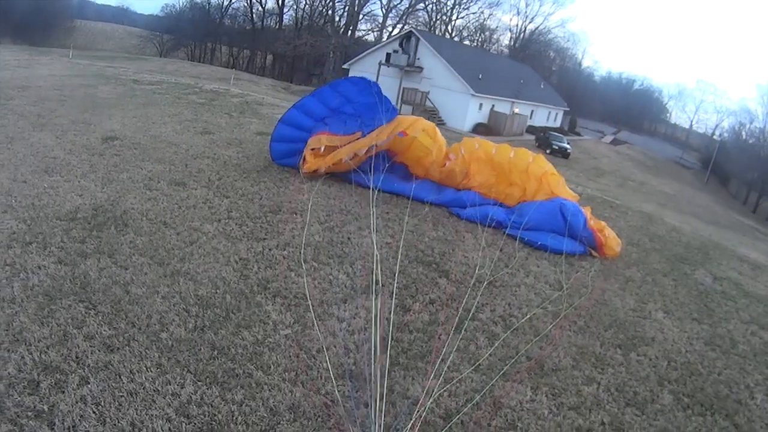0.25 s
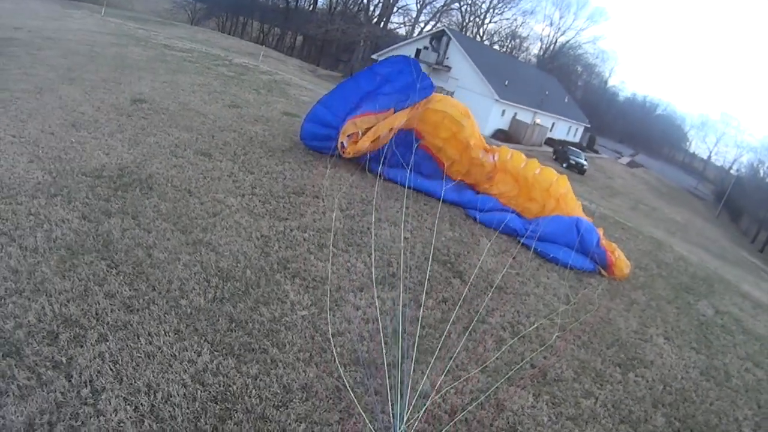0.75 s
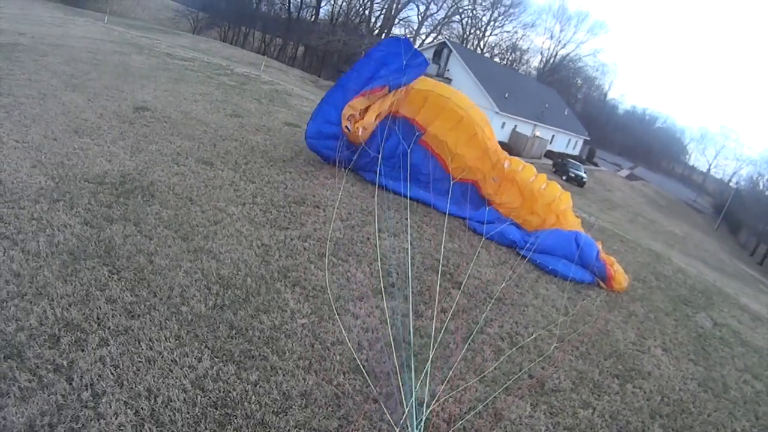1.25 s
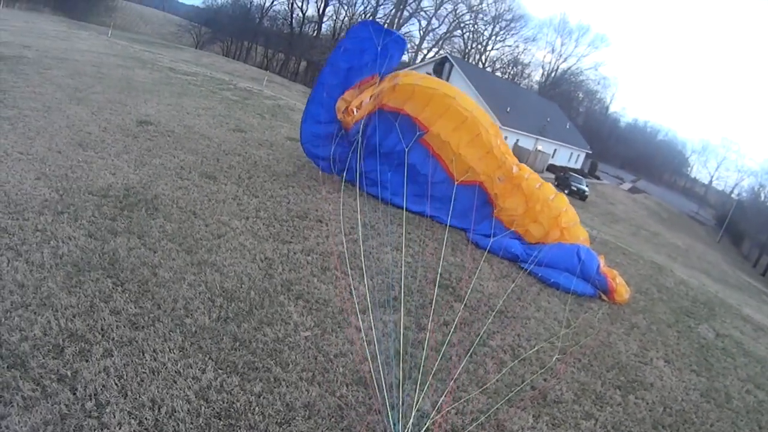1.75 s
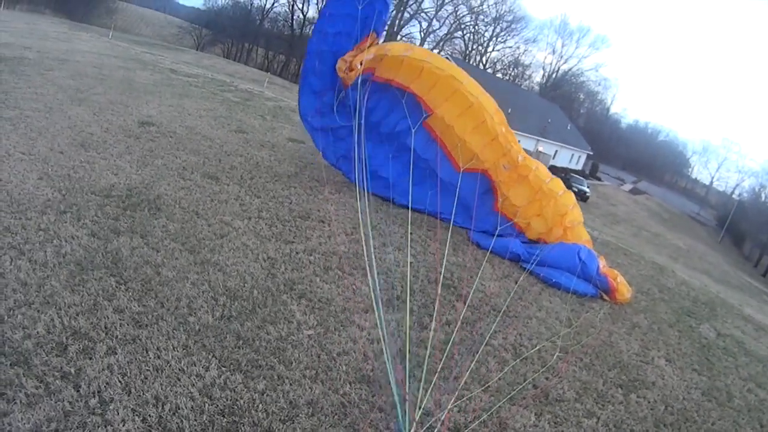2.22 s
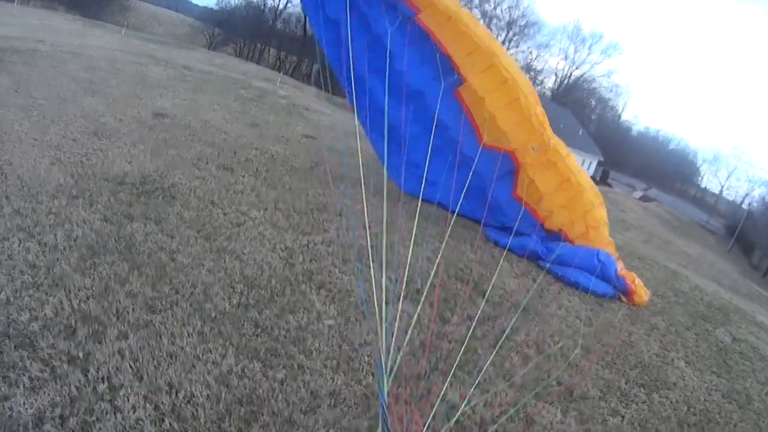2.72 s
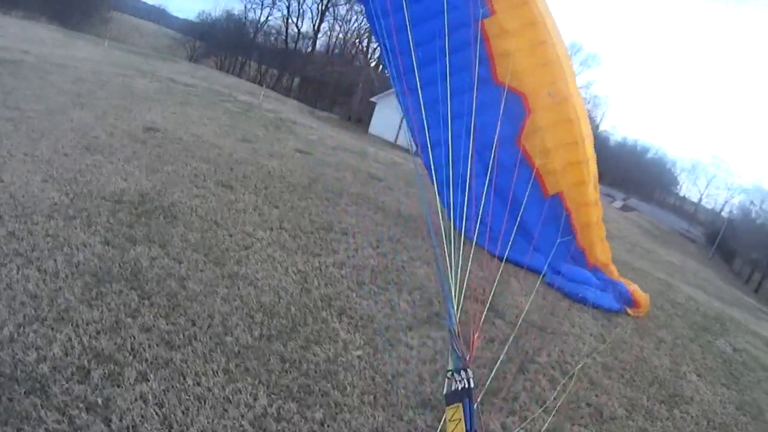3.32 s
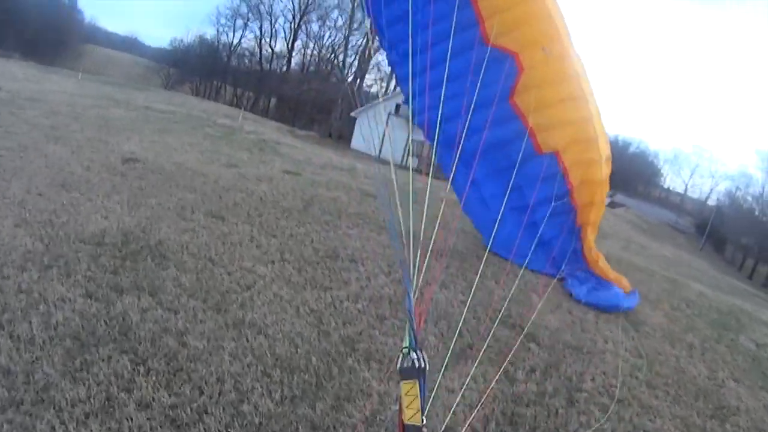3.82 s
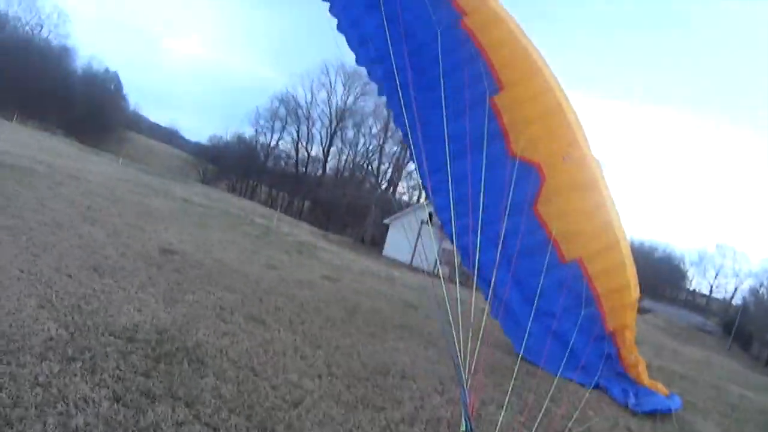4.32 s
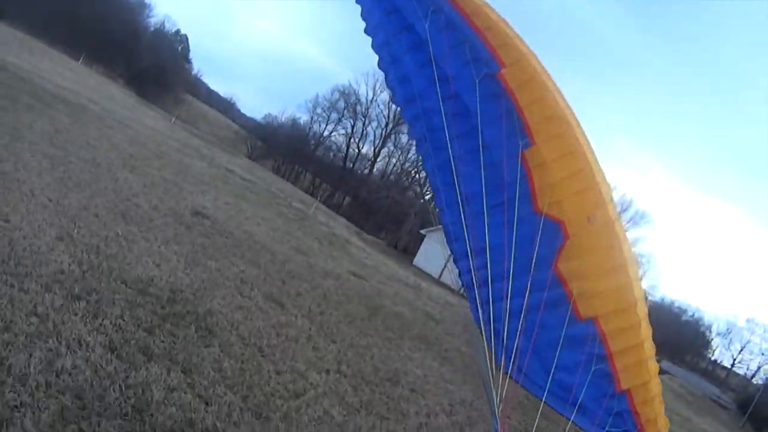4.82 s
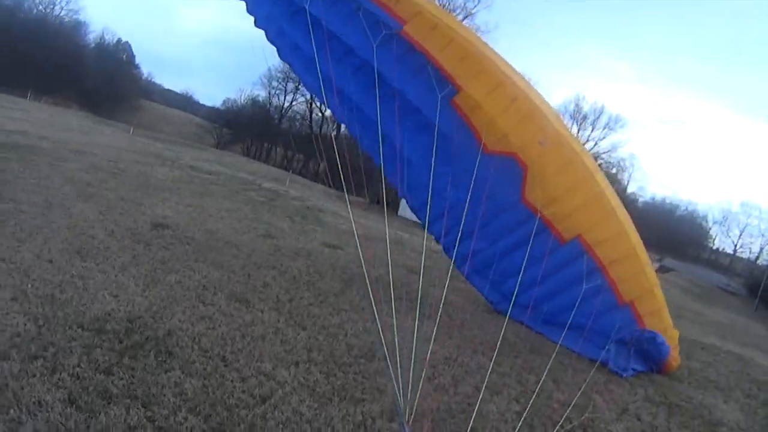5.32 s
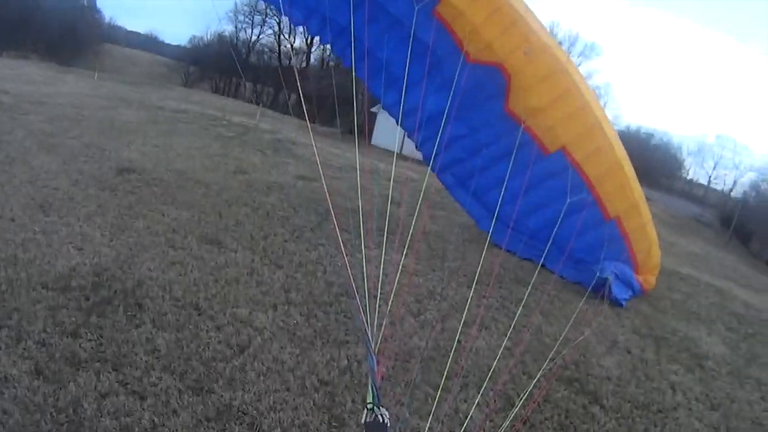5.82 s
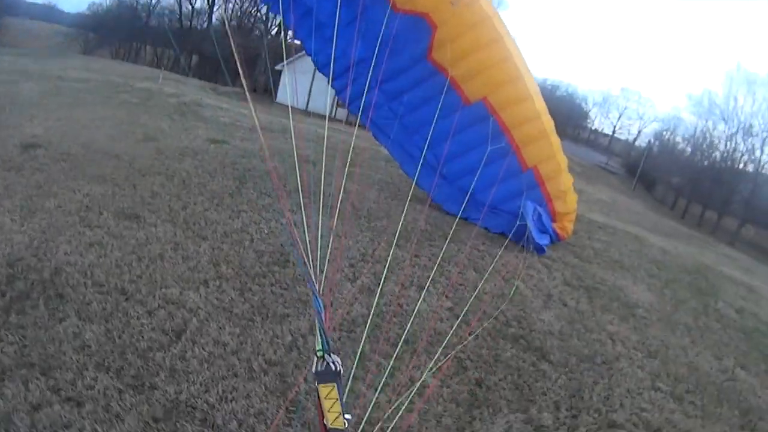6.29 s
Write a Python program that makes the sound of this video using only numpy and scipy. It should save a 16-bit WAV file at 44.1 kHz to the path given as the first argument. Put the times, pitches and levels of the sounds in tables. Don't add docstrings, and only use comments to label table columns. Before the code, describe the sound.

Quiet at first: faint rumbling wind and thin fabric rustling. As the wing fills, the rustle swells, followed by crowded plastic clacks, strap rubs, dull jolts and deep gust thuds, very close and in stereo. A short lull precedes the biggest thump and groaning creak, after which it calms to nylon hiss, a few fine clicks and a last brief squeak. Open field, no echo.

```python
import sys
import numpy as np
from scipy import signal
from scipy.fft import rfft, irfft, next_fast_len
from scipy.io import wavfile
from scipy.ndimage import uniform_filter1d, minimum_filter1d, map_coordinates

SR = 44100
rng = np.random.default_rng(int(sys.argv[2]) if len(sys.argv) > 2 else 0)


def makeup_ratio(level_db):
    decades = np.asarray(level_db, float) / 20
    return 10 ** decades


def log_audio(samples):
    frames = np.atleast_2d(samples).T
    limited = np.clip(frames, -1, 1)
    pcm = np.round(limited * 32767).astype(np.int16)
    wavfile.write(sys.argv[1], SR, pcm)


N = 288855


def unit(x):
    return x / np.sqrt(np.mean(x ** 2) + 1e-20)


def along(points, hz):
    f, v = np.transpose(points)
    return np.interp(np.log(hz + 1), np.log(f + 1), v)


def curves(rows):
    s, *cols = np.transpose(rows)
    return [np.interp(np.arange(N) / SR, s, c) for c in cols]


def wobble(rate):
    knots = rng.standard_normal(int(N * rate / SR) + 4)
    return map_coordinates(knots, [np.arange(N) * rate / SR])


def filtered(x, response):
    m = next_fast_len(N + SR // 8)
    return irfft(rfft(x, m) * response(np.fft.rfftfreq(m, 1 / SR)), m)[..., :N]


def add(track, s, burst):
    start = round(s * SR)
    part = track[..., start:start + burst.shape[-1]]
    part += burst[..., :part.shape[-1]]


# frequency in Hz, likeness (1 is the same).
PORT_LIKENESS = [(40, 0.99), (90, 0.89), (170, 0.83), (300, 0.86), (550, 0.25), (1100, 0.66), (1650, 0.81),
                 (2050, 1), (2800, 0.86), (5000, 0.98), (6700, 0.92), (10000, 0.94)]


def rush(spectrum, patchy_db, grainy_db, common=1):
    z = signal.stft(rng.standard_normal((2, N)), nperseg=512)[2]
    field = uniform_filter1d(rng.standard_normal(z.shape[1:]), 6, 0)
    field = unit(uniform_filter1d(field, 10, 1))
    pair = signal.istft(z * makeup_ratio(patchy_db * field), nperseg=512)[1][:, :N]
    pair = pair * makeup_ratio(grainy_db * wobble(300))

    def mid_side(hz):
        turn = np.arccos(np.clip(common * along(PORT_LIKENESS, hz), -1, 1)) / 2
        return makeup_ratio(along(spectrum, hz)) * [np.cos(turn), np.sin(turn)]

    mid, side = filtered(pair, mid_side)
    return unit(np.array([mid + side, mid - side]))


# time in seconds, strength at the ports in dB.
WIND_STRENGTH = [(0, -42), (.38, -39), (.64, -47), (.91, -43.5), (1.2, -45.5), (1.65, -44.5), (1.76, -48.5),
                 (1.9, -44), (2.5, -42), (2.64, -35.5), (2.92, -34.5), (3.1, -43.5), (3.6, -29.5),
                 (4.2, -36), (5.4, -34.5), (5.6, -47), (5.85, -39.5), (6.55, -32)]
# time in seconds, peak in dB, half length in seconds.
PUFFS = [(0.373, -46, 0.21), (1.368, -49, .1), (1.636, -41.5, 0.096), (2.2, -38, 0.053), (2.642, -37, 0.18),
         (2.89, -30.5, 0.23), (3.24, -33.5, 0.13), (3.452, -24, 0.064), (3.667, -28.5, 0.14),
         (3.904, -25.5, 0.041), (4.1, -25.5, 0.14), (4.325, -21, 0.061), (4.456, -30, 0.048),
         (4.654, -27.5, .11), (5.196, -56, 0.47), (5.539, -10.5, 0.037), (5.629, -14.5, 0.052),
         (5.75, -22.5, 0.032), (5.994, -32, .07), (6.341, -31, 0.084), (6.514, -51, .1)]


def wind_levels():
    buffet_over_wind_db, puff_fall_db = -7, 15
    puff_share = 0.26
    wind_db, = curves(WIND_STRENGTH)
    t = np.arange(N) / SR
    power = makeup_ratio(2 * (wind_db + buffet_over_wind_db))
    for s, db, half_s in PUFFS:
        power = power + makeup_ratio(2 * (db - puff_fall_db * np.abs(t - s) / half_s))
    buffet_db = 10 * np.log10(power)
    return buffet_db, wind_db + puff_share * (buffet_db - wind_db - buffet_over_wind_db - 8)


# frequency in Hz, level in dB per Hz.
BUFFET_COLOR = [(15, -3.5), (30, -1.5), (60, -10.5), (120, -12), (250, -14.5), (600, -74)]
# frequency in Hz, level in dB per Hz.
BODY_COLOR = [(90, -20), (150, -8), (240, -9), (290, 1), (350, -9), (470, -10), (550, -15), (650, -12),
              (1000, -15), (1500, -30)]


def wind():
    buffet_db, body_db = wind_levels()
    apart = np.clip((buffet_db + 48) / 320, 0, 1)
    shared = rush(BUFFET_COLOR, patchy_db=0.2, grainy_db=1.5)
    separate = rush(BUFFET_COLOR, patchy_db=-6.5, grainy_db=-1.5, common=0)
    lumps = np.sqrt(1 - apart) * shared + np.sqrt(apart) * separate
    buffet = makeup_ratio(buffet_db + 2.2 * wobble(25)) * lumps
    body = makeup_ratio(body_db - 2 + 1.6 * wobble(30)) * rush(BODY_COLOR, patchy_db=1.2, grainy_db=1.5)
    return buffet + body


# time in seconds, level in dB.
FLAPPING = [(0, -35.5), (.62, -39.5), (.87, -39), (1.05, -35), (1.25, -39.5), (2.12, -39), (2.55, -34),
            (2.85, -27.5), (3.16, -32), (3.47, -31), (3.64, -29), (3.77, -35), (3.9, -32.5), (4.03, -39.5),
            (4.32, -36.5), (4.58, -39), (6.25, -39.5), (6.55, -41)]
# time in seconds, share of cloth sound that differs between the ports.
WING_SPREAD = [(0, 0.009), (2.4, 0.021), (2.9, 0.075), (4, 0.19), (6.55, 0.21)]
# frequency in Hz, level in dB per Hz.
RUSTLE_COLOR = [(900, -26.5), (1300, -8.5), (1700, -4), (2050, 0.5), (2400, -5), (2800, -9.5), (3600, -16),
                (5000, -39.5)]
# frequency in Hz, level in dB per Hz.
HISS_COLOR = [(2000, -41), (3000, -14), (3900, -10), (5050, -4.5), (5900, -10), (6500, -13.5), (7200, -10),
              (8900, -18), (9700, -13), (11000, -23)]


def cloth():
    hiss_db, = curves(FLAPPING)
    wide = np.clip(curves(WING_SPREAD)[0], 0, 1)
    rustle_db = hiss_db - 0.46 + 4.5 * wide
    rustle_wide = np.clip(0.5 * wide, 0, 1)
    flap = wobble(21.7)
    out = 0
    for hiss_share, rustle_share, common in ((1 - wide, 1 - rustle_wide, 1), (wide, rustle_wide, 0)):
        rustle = rush(RUSTLE_COLOR, patchy_db=0.8, grainy_db=1.0, common=common)
        rustle = makeup_ratio(rustle_db) * makeup_ratio(0.6 * flap) * rustle
        hiss = rush(HISS_COLOR, patchy_db=1.03, grainy_db=0.97, common=common)
        hiss = makeup_ratio(hiss_db + 0.51 * flap) * hiss
        out = out + np.sqrt(rustle_share) * rustle + np.sqrt(hiss_share) * hiss
    return out


# time in seconds, peak in dB, pitch in Hz.
LINE_TICKS = [(3.2573, -11, 9480), (3.2575, -14, 7120), (3.2577, -6, 4800), (3.3245, -18, 9000),
              (3.353, -16, 7000), (3.8013, -21, 4706), (5.02, -18, 4840), (6.148, -22, 7670),
              (6.1923, -23, 6670), (6.227, -20, 7700), (6.2052, -24, 8950), (6.232, -20, 10600),
              (6.2364, -27, 10300), (6.2506, -21, 9900), (6.2614, -20, 8000), (6.331, -22, 8700)]


def ticks():
    out, t = np.zeros(N), np.arange(SR // 100) / SR
    for s, db, hz in LINE_TICKS:
        click = np.sin(2 * np.pi * hz * t) + 0.45 * rng.standard_normal(len(t))
        add(out, s, makeup_ratio(db - 60 * t / 0.005) * click)
    return filtered(out, lambda hz: hz ** 2 / (hz ** 2 + 3500 ** 2))


# time in seconds, peak in dB, length in seconds.
JOLTS = [(2.789, -25.5, 0.03), (2.884, -42, 0.0061), (3.136, -27.5, 0.038), (3.388, -22, 0.014),
         (3.418, -42, 0.013), (3.59, -37, 0.0079), (3.674, -16, 0.014), (3.827, -24.5, 0.016),
         (3.901, -29, 0.013), (4.082, -21, 0.061), (4.321, -24, 0.05), (4.39, -26.5, 0.014),
         (4.452, -32, 0.012), (4.481, -26.5, 0.027), (4.593, -29, 0.035), (4.636, -40, 0.022),
         (4.678, -30, 0.018), (4.875, -22.5, 0.043), (5.099, -25.5, 0.022), (5.198, -31, 0.016),
         (5.433, -33, 0.026), (5.529, -17.5, 0.026), (5.57, -26, 0.099), (5.671, -30.5, 0.071),
         (5.746, -20, 0.013), (6.357, -20.5, 0.018)]
# frequency in Hz, level in dB per Hz.
JOLT_COLOR = [(20, 8), (100, -18), (200, -3.5), (300, 5.5), (400, -7.5), (700, -7), (1500, -7), (3000, -52)]


def bumps():
    force = np.zeros(N)
    for s, db, length in JOLTS:
        t = np.arange(round(4 * length * SR)) / (length * SR)
        add(force, s - 0.11 * length, makeup_ratio(db + 3.5) * np.minimum(1, 4 * t) * np.exp(-1.2 * t ** 2))
    return force * rush(JOLT_COLOR, patchy_db=-1.5, grainy_db=-4.0, common=0.55)


STRAP_PUSH_PULL = [
    [1.7],
    [-2.4],
]
# time in seconds, level in dB, pitch in Hz, length in seconds,
# facing (positive: ports move together, negative: against each other).
STRAP_RUBS = [(2.648, -19, 2040, 0.014, -0.91), (2.672, -27, 1780, 0.03, -1),
              (2.816, -18, 1900, 0.028, -0.88), (3.83, -20, 1290, 0.015, 1),
              (3.94, -19.5, 656, 0.031, 0.91), (4.077, -30, 1300, .02, 1), (4.75, -22, 1660, .024, -1),
              (4.759, -27, 2050, 0.028, -1), (4.766, -8, 2450, .019, -0.79), (5.447, -23, 980, .026, 1),
              (5.446, -14.5, 2000, .02, 1), (5.499, -22, 1200, 0.04, 1), (5.526, -16.5, 560, 0.032, 1),
              (5.61, -23, 500, 0.031, 1), (5.666, -32, 1400, .02, 1), (6.368, -25.5, 1390, 0.025, 1),
              (6.483, -34.5, 1110, .026, 1)]


def rubs():
    out = np.zeros((2, N))
    for s, db, hz, length, facing in STRAP_RUBS:
        t = np.arange(round(2 * length * SR)) / (length * SR)
        grit = rng.standard_normal(len(t)) ** 3 + 0.35 * rng.standard_normal((2, len(t))) ** 3
        mode = signal.iirpeak(hz, 2.5, SR)
        band = signal.lfilter(*mode, signal.lfilter(*mode, grit))
        sides = np.where(facing < 0, STRAP_PUSH_PULL, 1)
        add(out, s, sides * makeup_ratio(db - 3.0) * unit(band) * np.minimum(1, 3 * t) * np.exp(-t ** 4))
    return out


def driven(rows, rough, fade, lift_db, overtone_db):
    sag = 0.07
    out = np.zeros((2, N))
    for s, db, hz, length in rows:
        t = np.arange(round((length + 6 * fade) * SR)) / SR
        waver = np.interp(t * hz / 2, np.arange(200), rng.standard_normal(200))
        pitch = hz * (1 + rough * waver + sag * (0.5 - np.minimum(t / length, 1)))
        turns = np.cumsum(pitch) / SR + rng.random() + rng.normal(0, 0.02, (2, 1))
        swell = 1 - np.exp(-t / (0.12 * length))
        shape = swell * np.exp(-np.clip(t - length, 0, None) / fade)
        partials = np.cos(4 * np.pi * turns) + 0.5 * np.sin(6 * np.pi * turns)
        tone = np.sin(2 * np.pi * turns) + makeup_ratio(overtone_db) * shape * partials
        add(out, s - 0.2 * length, makeup_ratio(db + lift_db + 43 * rough * waver[::-1]) * shape * tone)
    return out


# time in seconds, level in dB, pitch in Hz, length in seconds.
HOUSING_SQUEAKS = [
    (6.536, -19, 2110, 0.018),
]
# time in seconds, level in dB, pitch in Hz, length in seconds.
STRAP_SQUEAKS = [
    (1.644, -16.5, 2090, 0.0035),
    (1.644, -20, 1350, 0.0028),
]


def squeaks():
    housing, strap = (driven(rows, rough=0.025, fade=0.002, lift_db=-2.5, overtone_db=-40)
                      for rows in (HOUSING_SQUEAKS, STRAP_SQUEAKS))
    return housing + STRAP_PUSH_PULL * strap


# time in seconds, peak in dB, pitch in Hz, length in seconds.
MOUNT_GROANS = [(2.745, -30, 198, 0.024), (2.886, -26.5, 184, 0.016), (2.913, -42, 207, 0.0071),
                (2.947, -27, 190, 0.017), (2.976, -38, 247, 0.023), (3.285, -30, 184, 0.011),
                (3.475, -24.5, 197, 0.023), (3.613, -18, 193, 0.021), (3.701, -17, 178.5, 0.018),
                (4.016, -25.5, 172, 0.031), (4.124, -15, 186, 0.01), (4.284, -16, 230, 0.0084),
                (4.904, -33, 206, 0.013), (5.352, -33.5, 206, 0.023), (5.521, -15.5, 93, .02),
                (5.536, -13.5, 234, .02), (5.625, -6.5, 242, 0.0187), (6.301, -29.5, 209, 0.014),
                (2.745, -24, 195, 0.024),
    (3.875, -25, 189, 0.019),
    (5.022, -30, 183, 0.025),
]


def groans():
    return driven(MOUNT_GROANS, rough=0.04, fade=0.005, lift_db=1.5, overtone_db=-14)


# time in seconds, peak in dB, ring in Hz, brightness of the edge in dB.
HARD_SLIPS = [(2.6045, -19.5, 890, -6), (2.8606, -12.5, 1420, 2), (2.8931, -17.5, 1210, 2),
              (3.3875, -11, 1200, -17), (3.4537, -11.5, 1220, -14), (3.477, -15.5, 1270, 1.5),
              (3.544, -17, 880, -7), (3.5838, -9, 1410, -31), (3.6747, -9, 1430, -23),
              (3.7341, -11.5, 1270, -27), (3.833, -13.5, 1330, -9), (3.8693, -17, 1220, 3),
              (4.0137, -9.5, 1320, -13), (4.124, -16, 560, -24), (4.1415, -11.5, 1200, -34),
              (4.2769, -13.5, 1190, 1.5), (4.332, -8, 1260, -12), (4.3757, -12, 1700, -10),
              (4.3968, -12.5, 1300, -19), (4.6866, -11, 1190, -23), (4.8834, -5.5, 1930, -27),
              (5.1019, -14, 1330, -4), (5.207, -12, 1390, -2), (5.5752, -10.5, 1140, -12),
              (5.6906, -17.5, 1290, -1), (5.748, -13, 1200, -16), (6.148, -15, 1360, 0.5),
              (6.3043, -15.5, 1070, -16), (6.3594, -15.5, 1380, -7.5)]
# time in seconds, peak in dB, ring in
# Hz.
FAINT_SLIPS = [(2.711, -22.5, 2000), (2.878, -32, 1970), (2.9554, -18.5, 1890), (2.987, -20, 2100),
               (3.6414, -26, 1080), (4.1843, -18, 1760), (4.268, -24, 1240), (4.393, -17, 750),
               (4.459, -24.5, 1500), (4.8755, -19.5, 1080), (5.093, -18.5, 1330), (5.259, -25.5, 1970),
               (5.4796, -23, 1960), (5.9462, -22.5, 680), (6.3136, -24, 1270), (6.3758, -20, 1350),
               (6.501, -31, 1270)]
# time in seconds, peak in dB, ring in
# Hz, edge in dB.
CREAKS = [(2.6388, -20, 2100, -14), (2.648, -15.5, 2070, -10), (2.6559, -24, 560, 2),
          (2.6733, -21.5, 1770, -15), (2.691, -25, 1790, -16), (2.8057, -20, 2000, -7),
          (2.8166, -22, 1520, -8), (2.8207, -27, 2020, -9), (2.827, -28, 2000, -17),
          (2.832, -20, 1680, -15), (2.8349, -22, 2220, -12), (3.1565, -34, 2330, -2),
          (3.164, -23, 560, -4), (3.5317, -26, 1060, -5), (3.5365, -24, 2250, -4),
          (3.691, -19.5, 1190, -15), (3.696, -19.5, 1210, -11), (3.705, -16, 1280, -20),
          (3.9364, -11.5, 1200, -14), (3.9414, -16, 1220, -17), (3.946, -14, 1270, -3),
          (3.9498, -12, 1240, -4), (3.9538, -16, 1240, -20), (3.961, -21.5, 1290, 3),
          (4.0512, -19.5, 1470, -7), (4.0542, -15.5, 1900, -18), (4.0645, -14, 1000, -10),
          (4.071, -13.5, 595, -21), (4.0747, -17.5, 1220, -21), (4.086, -23, 1110, -19),
          (4.091, -26, 1490, -11), (4.0934, -21.5, 1410, -1),
          (4.291, -25, 1120, -3), (4.2952, -25, 1200, -14), (4.3043, -19, 1870, -16),
                 (4.312, -30, 1960, -11), (4.4856, -22, 660, -9), (4.4894, -28, 1790, -9),
                 (4.4943, -25.5, 1080, -9), (4.5966, -22, 570, -19), (4.6114, -20, 1270, -8),
                 (4.8953, -20, 1870, -17), (4.9071, -25, 1930, -11), (5.4405, -13.5, 1070, -6),
                 (5.4485, -16, 1040, -5), (5.4543, -12, 1080, -9), (5.4605, -10.5, 1080, -12),
                 (5.4639, -10, 1110, -15), (5.4675, -12, 1860, 1), (5.469, -11, 1290, -25),
                 (5.505, -27, 1200, -12), (5.5164, -19, 1240, -7), (5.526, -13.5, 1100, -1),
                 (5.5355, -18, 600, -11), (5.599, -14, 810, -17), (5.603, -12.5, 1350, -9),
                 (5.6129, -17.5, 1350, 3), (5.621, -17, 1420, -10), (5.6675, -24, 600, -13),
                 (5.6736, -27, 560, -15), (5.677, -33, 750, -13), (5.9965, -21, 560, -20),
                 (5.9998, -18, 660, -26), (6.24, -24.5, 557, -8)]


def contacts():
    hard_ring_s, creak_ring_s = 0.006, 0.013
    rows = []
    for s, db, hz, edge_db in HARD_SLIPS:
        rows.append((s, db, hz, edge_db, hard_ring_s))
        rows.append((s + 0.0063, db - 16, hz, edge_db, hard_ring_s))
    for s, db, hz in FAINT_SLIPS:
        rows.append((s, db, hz, -17, creak_ring_s))
    return rows + [(*row, creak_ring_s) for row in CREAKS]


# frequency in Hz, width in Hz, level in dB.
SHELL_MODES = [(468.3, 30, -6), (632, 74, -2.5), (1200, 240, 5), (2000, 125, -4.5), (335, 44, -3)]


def slips():
    out, t = np.zeros((2, N)), np.arange(SR // 20) / SR
    for s, db, hz, edge_db, ring_s in contacts():
        life = ring_s * makeup_ratio(rng.normal(0, 1.5) + np.array([[1.5], [-1.5]]))
        ring = makeup_ratio(-60 * (t / life) ** 1.094) * np.sin(2 * np.pi * hz * t)
        overtone_hz, upper_hz = hz * rng.uniform(1.53, 2.12), rng.uniform(2300, 2800)
        overtone = makeup_ratio(-6.5 - 60 * t / 0.0065) * np.sin(2 * np.pi * overtone_hz * t)
        upper = makeup_ratio(edge_db + 4.5 - 60 * t / 0.0045) * np.sin(2 * np.pi * upper_hz * t)
        edge = makeup_ratio(edge_db + 10.5 - 60 * t / 0.0029) * rng.standard_normal(len(t))
        shell = 0
        for k, (mode_hz, width, level) in enumerate(SHELL_MODES):
            mode_db = level - 13 + rng.normal(0, 2.5, (2, 1)) - 17.6 * width * t
            shell = shell + (-1) ** k * makeup_ratio(mode_db) * np.sin(2 * np.pi * mode_hz * t)
        shell = min(1, 1400 / hz) ** 3 * shell
        rattle_db = -11.5 - 0.24 * (db + 23.0) - 60 * t / 0.075
        rattle = makeup_ratio(rattle_db) * rng.standard_normal((2, len(t)))
        from_strap = s < 2.85 and hz > 1400
        sides = np.where(from_strap, STRAP_PUSH_PULL, 1) * rng.choice([-1, 1])
        add(out, s, sides * makeup_ratio(db + 3.5) * (ring - overtone + upper + edge + shell + rattle))

    def small_parts(hz):
        return 1j * hz / (250 + 1j * hz) / (1 + 1.3j * hz / 3700 - (hz / 3700) ** 2) ** 2

    return filtered(out, small_parts)


def scene():
    return wind() + cloth() + ticks() + bumps() + rubs() + squeaks() + groans() + slips()


def starved(x, gate_db):
    mid, side = (x[0] + x[1]) / 2, (x[0] - x[1]) / 2
    hz, _, z = signal.stft(np.array([mid, side]), SR, nperseg=2048)
    power = uniform_filter1d(np.abs(z) ** 2, size=40, axis=1)
    keep = (power[1] > makeup_ratio(2 * gate_db) * power[0]) | (hz[:, None] < 2800)
    side = signal.istft(z[1] * keep, SR, nperseg=2048)[1][:N]
    return np.array([mid + side, mid - side])


def roll_off(x):
    return signal.sosfilt(signal.butter(12, 12090, fs=SR, output="sos"), x)


# frequency in Hz, radians the left leads.
LEFT_LEAD = [(150, -.1), (200, -1), (270, -2.4), (400, -2.6), (650, -1.4), (1200, -.6), (1500, -.4),
             (1800, -1.2), (2150, -.55), (2800, -.4), (5000, -.25), (11000, -.1)]
# frequency in Hz, left over right in dB.
LEFT_LEVEL = [(60, 0), (200, -1.5), (400, -1.5), (650, 5), (900, 1), (1500, 4), (2000, -3), (2600, 2),
              (6000, -.5), (11000, -1.5)]


def record(dry):
    half = np.array([[0.5], [-0.5]])

    def ports(hz):
        return makeup_ratio(half * along(LEFT_LEVEL, hz)) * np.exp(1j * (half + 0.5) * along(LEFT_LEAD, hz))

    x = filtered(dry, ports)
    loud = uniform_filter1d(np.max(np.abs(x), axis=0), 500)
    need = np.minimum(1, (0.18 / (loud + 1e-9)) ** 0.9)
    duck = uniform_filter1d(minimum_filter1d(need, 500), 400)
    bass = filtered(x, lambda hz: 1 / (1 + (hz / 500) ** 2))
    upper = duck * (x - bass)
    bass = bass / (1 + np.abs(bass / 0.7) ** 4) ** 0.25
    upper = upper / (1 + np.abs(upper / 0.4) ** 4) ** 0.25
    top_hz = 11150
    mix = starved(filtered(bass + upper, lambda hz: hz < top_hz), gate_db=-13)
    return roll_off(mix)


dry = scene()
out = record(dry)
log_audio(out)
```